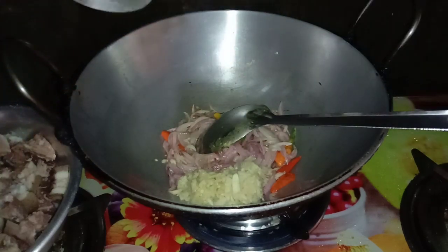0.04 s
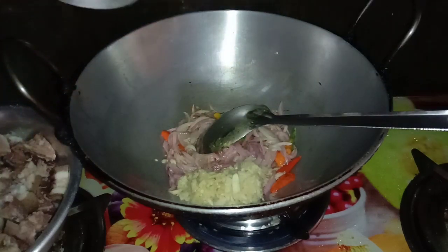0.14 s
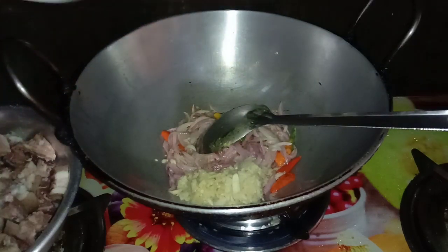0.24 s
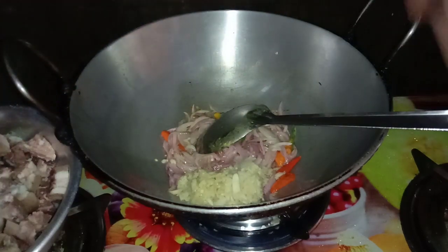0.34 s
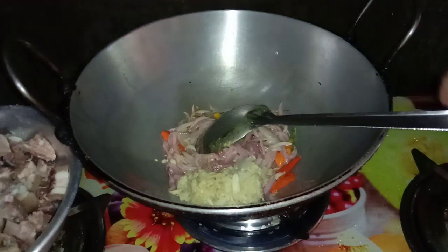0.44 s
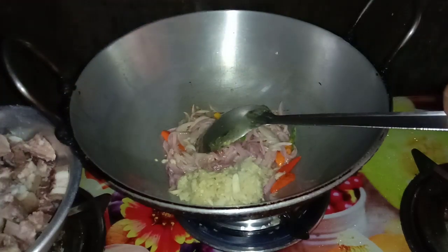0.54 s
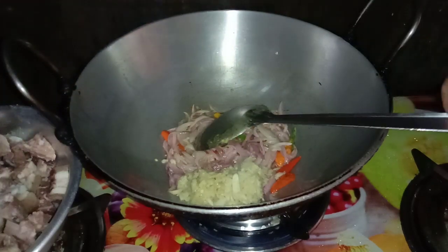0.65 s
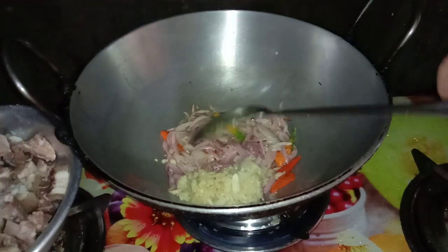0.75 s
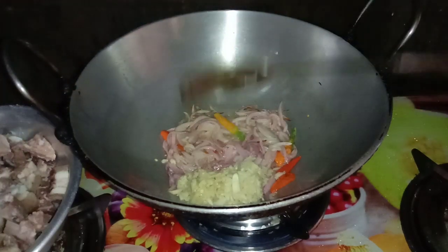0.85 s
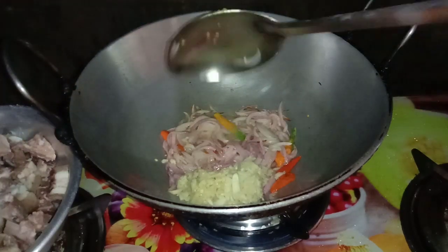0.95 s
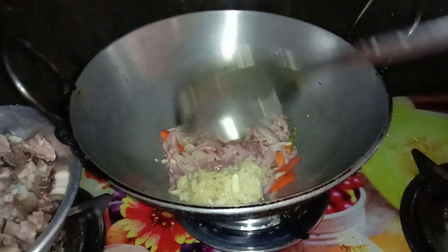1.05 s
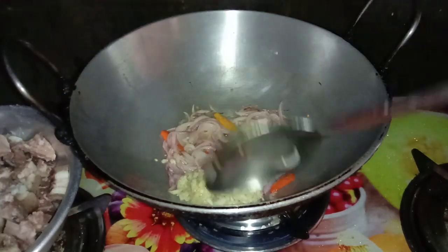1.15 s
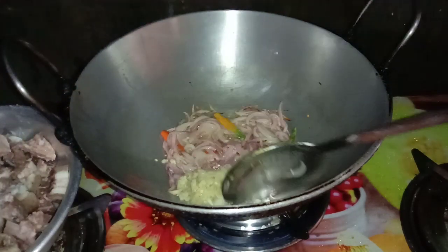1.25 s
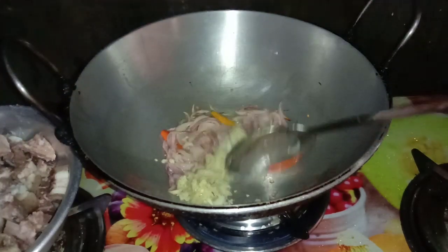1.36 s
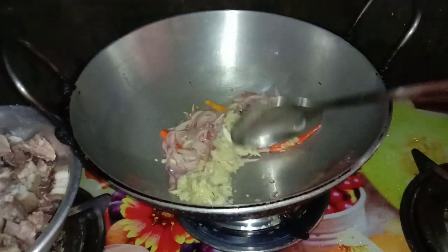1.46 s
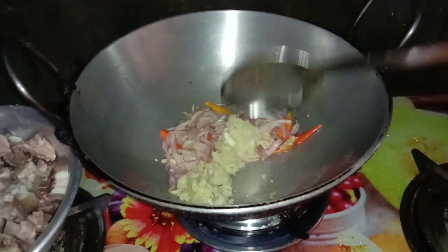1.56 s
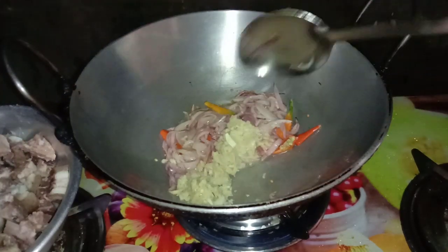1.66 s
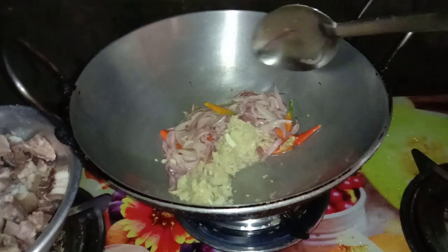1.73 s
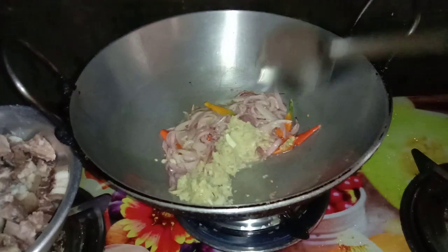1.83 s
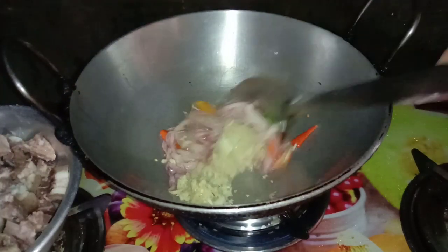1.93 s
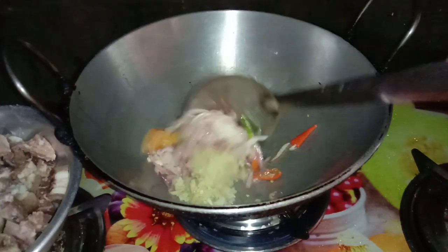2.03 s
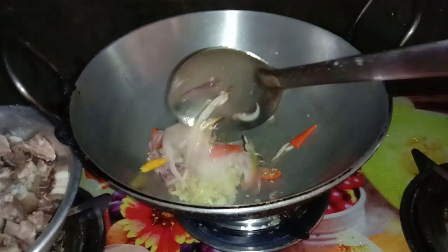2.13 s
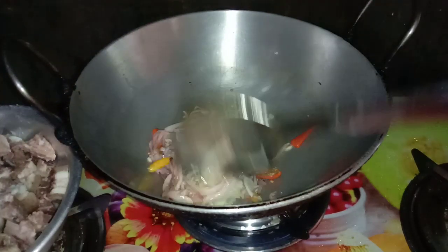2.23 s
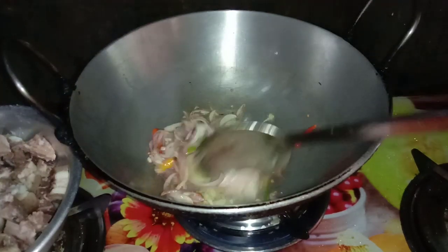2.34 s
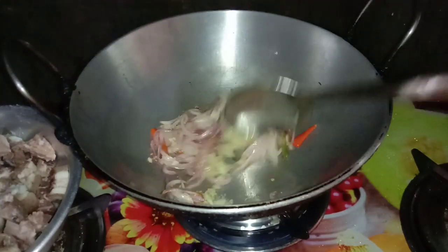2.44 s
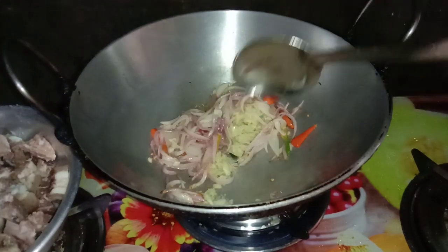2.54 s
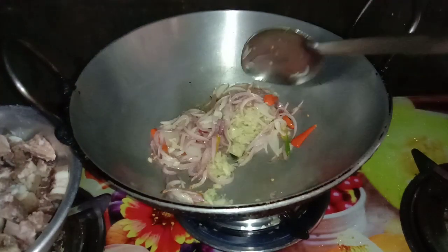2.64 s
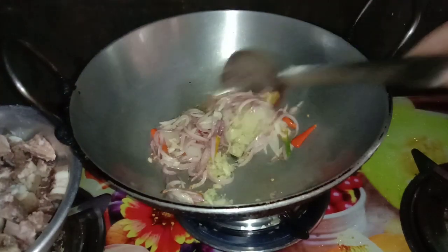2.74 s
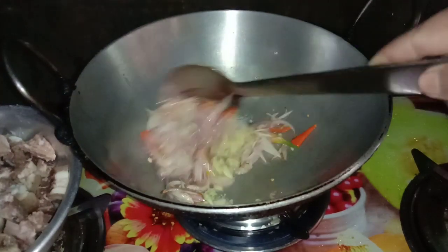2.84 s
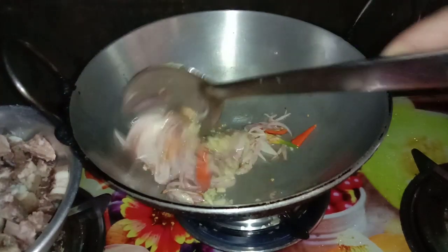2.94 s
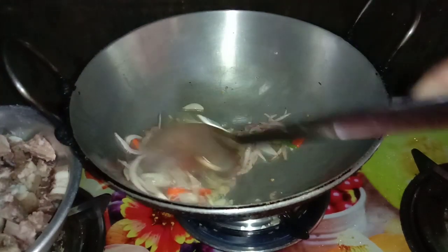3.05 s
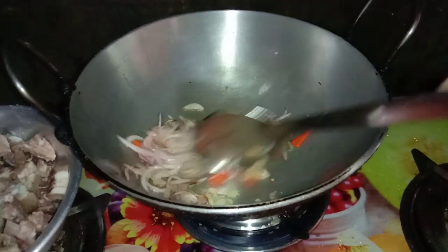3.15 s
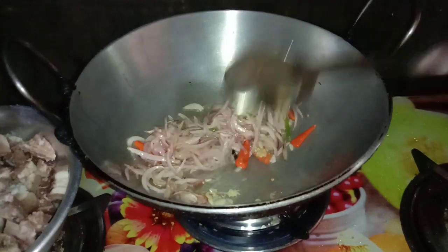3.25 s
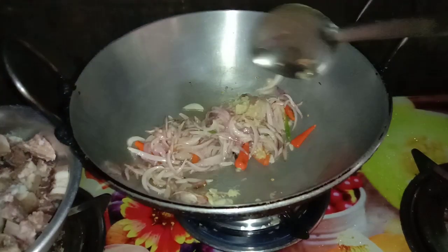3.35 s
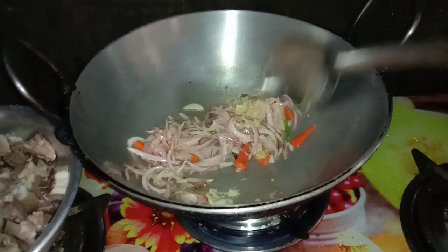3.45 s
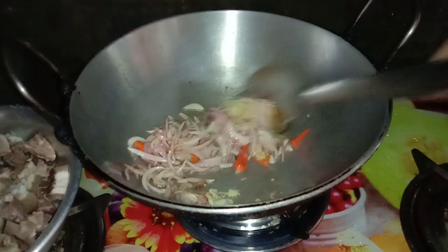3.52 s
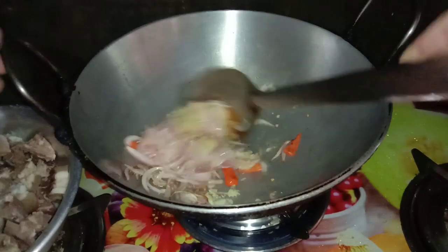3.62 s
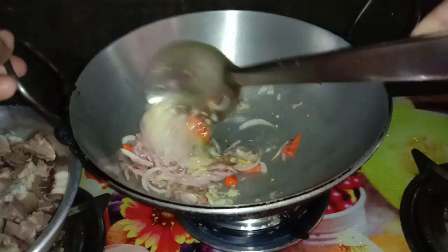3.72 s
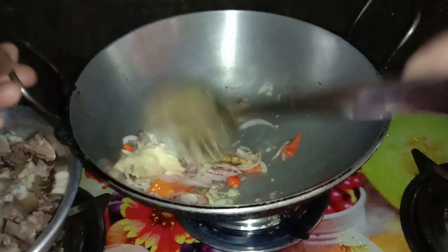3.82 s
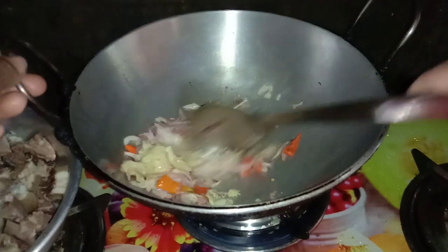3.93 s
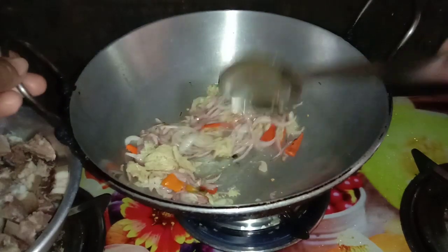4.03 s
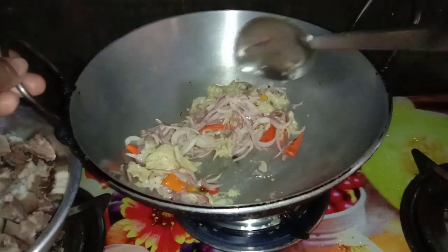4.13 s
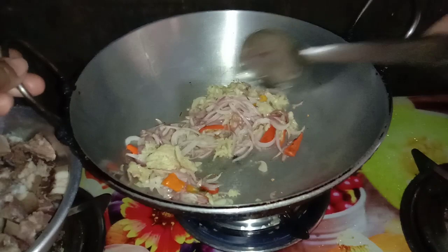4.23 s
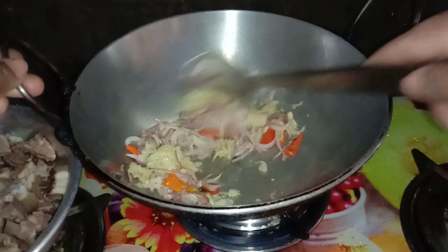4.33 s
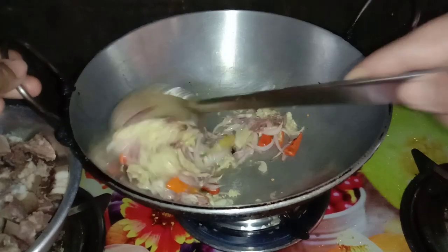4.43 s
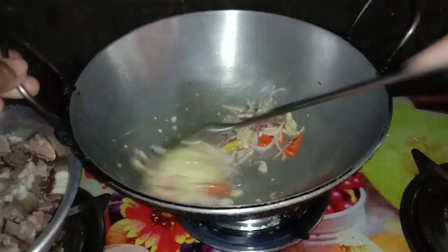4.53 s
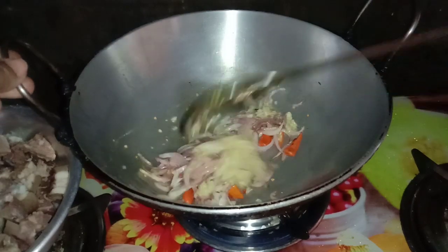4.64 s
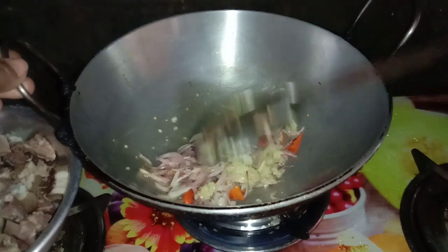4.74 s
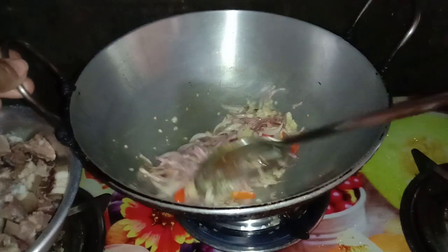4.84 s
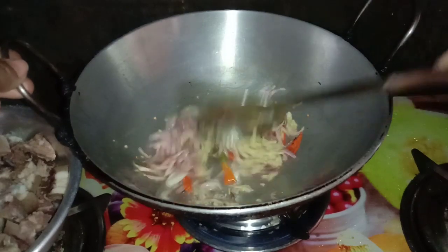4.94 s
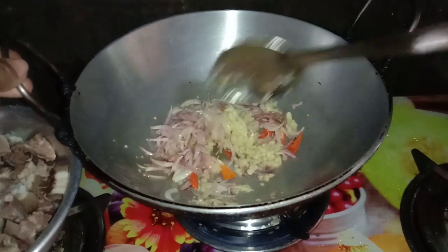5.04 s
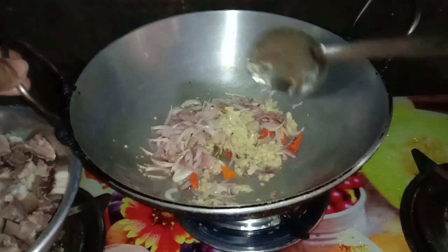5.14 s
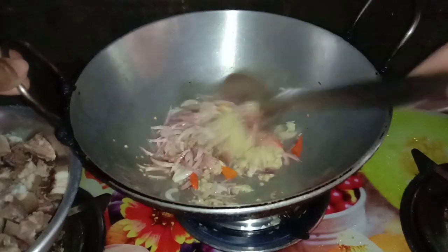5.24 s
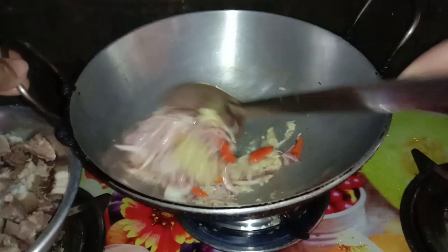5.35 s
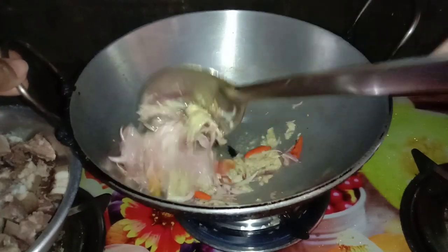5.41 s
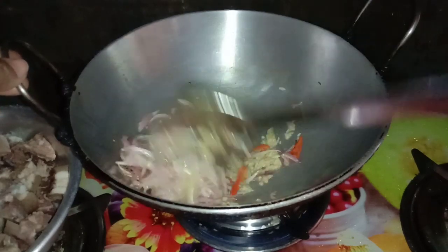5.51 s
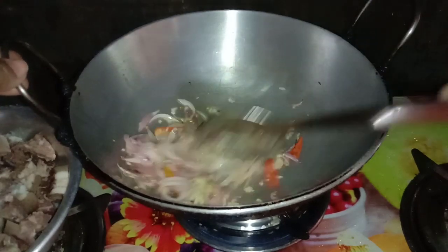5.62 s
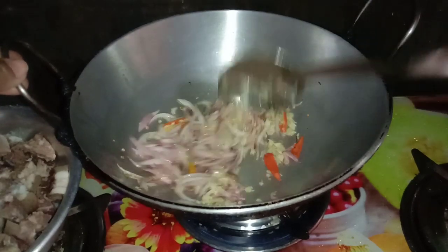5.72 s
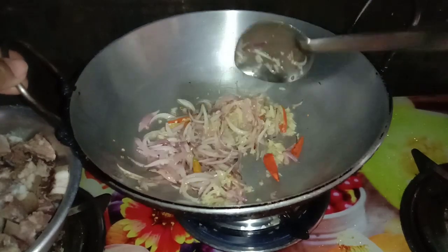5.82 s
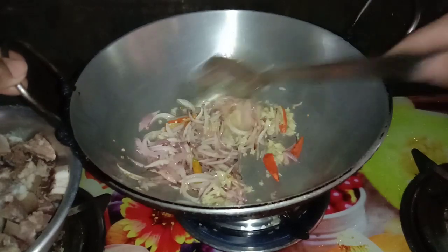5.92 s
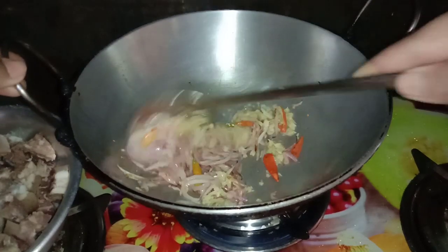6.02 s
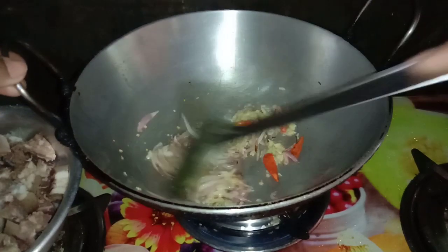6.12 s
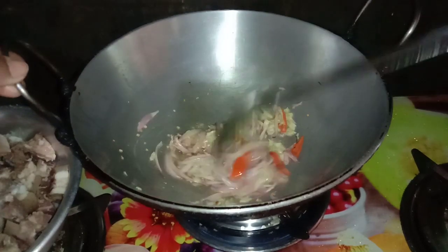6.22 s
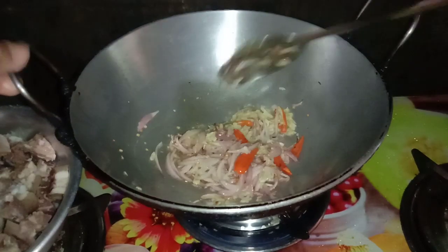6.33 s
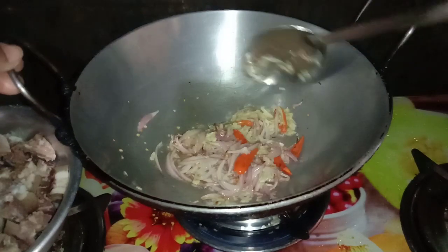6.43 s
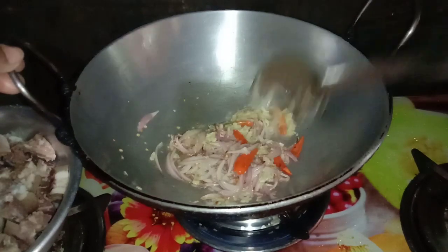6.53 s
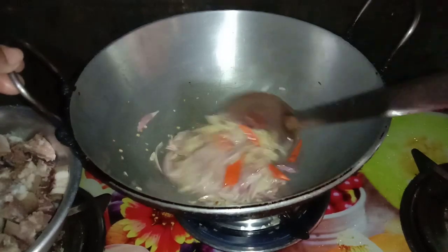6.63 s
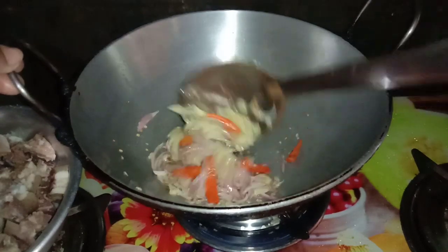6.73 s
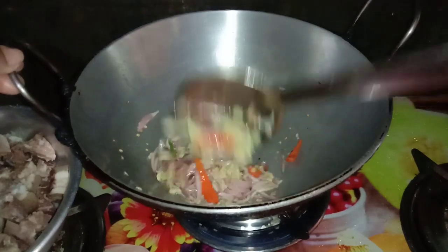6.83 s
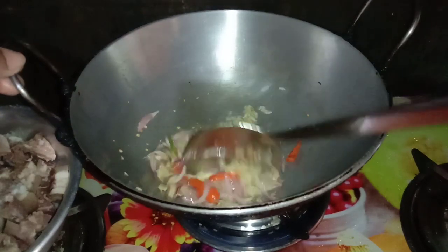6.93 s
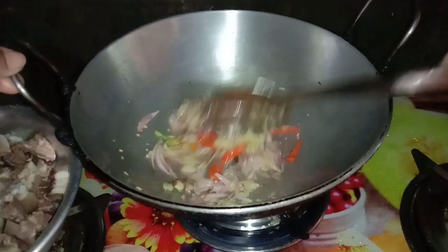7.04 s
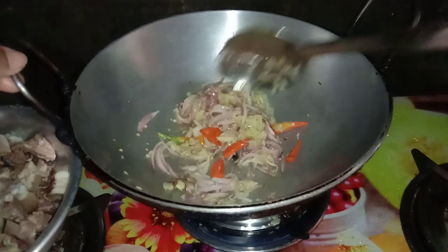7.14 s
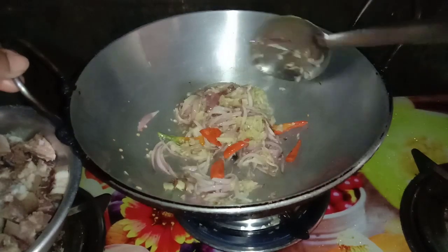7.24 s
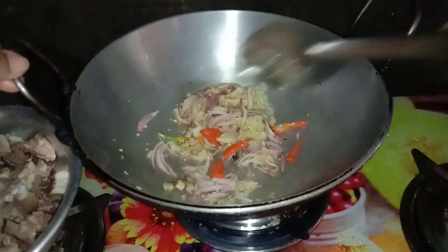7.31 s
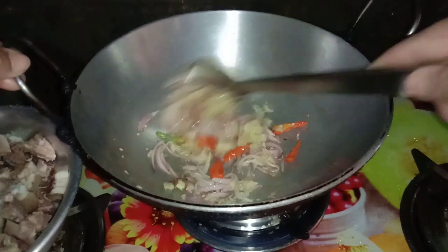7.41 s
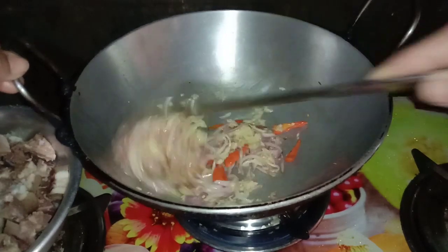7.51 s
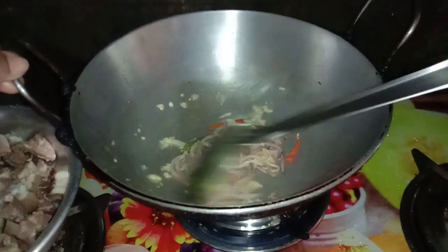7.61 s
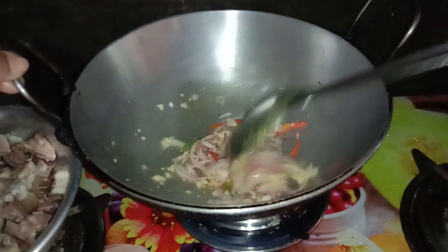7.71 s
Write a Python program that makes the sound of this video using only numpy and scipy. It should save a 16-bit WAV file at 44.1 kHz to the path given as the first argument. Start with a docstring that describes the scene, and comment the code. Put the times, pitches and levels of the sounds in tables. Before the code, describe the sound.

Close sizzling of vegetables frying in oil, with a steel bowl sliding aside, then a spoon striking, scraping and stirring in a wok.

```python
"""A steel bowl is set down and slid aside while onions and garlic sizzle in an oiled wok in a small kitchen.
A metal spoon strikes the wok, rocks it on its stand and stirs; a steadying hand damps the ring.
Each stroke presses wet food onto hot steel: water flashes to steam, so the sizzle swells and sinks.
Clumps land with soft thuds. A gas burner rushes underneath. The microphone is close."""
import sys
import numpy as np
from scipy import signal
from scipy.fft import rfft, irfft
from scipy.io import wavfile

SR = 44100
rng = np.random.default_rng(int(sys.argv[2]) if len(sys.argv) > 2 else 0)


def wav_record(signal):
    """Record a signal, one row per channel, as 16-bit PCM in the file named by sys.argv[1]."""
    frames = np.transpose(np.atleast_2d(signal))
    bounded = np.clip(frames, -1, 1)
    # unit amplitude maps onto the largest positive 16-bit level
    quanta = np.round(bounded * 32767).astype(np.int16)
    wavfile.write(sys.argv[1], SR, quanta)


N = 342657
TIME = np.arange(N) / SR

# sizzle of food lying still: t/s, level/dB
RESTING_SIZZLE = [(0.0, -35), (1.25, -34), (2.2, -34), (7.77, -37)]
# spoon strokes: t/s, length/s, release/s, sizzle/dB, spatter re sizzle/dB
STIR_STROKES = [(1.396, .27, .05, -31.5, -13.5), (1.69, 0.23, .05, -36, -23), (1.896, 0.25, .05, -30, -9.5),
                (2.12, .21, .04, -30.5, -7), (2.376, .11, 0.028, -26.5, -8.5),
                (2.51, 0.086, 0.045, -29, -11), (2.63, 0.24, 0.044, -29, -10.5),
                (2.851, 0.18, 0.073, -26.5, -12), (3.078, 0.46, 0.075, -28.3, -9.5),
                (3.598, 0.15, .015, -29.5, -13), (3.775, 0.19, .012, -30.5, -13),
                (3.986, .06, .04, -26, -20), (4.062, 0.24, .012, -29.5, -13.5),
                (4.324, .24, 0.064, -29, -10), (4.595, .19, .05, -27.5, -12),
                (4.818, 0.27, .06, -26.5, -14.5), (5.132, 0.29, .06, -27, -11.5),
                (5.449, .13, 0.063, -26.5, -11.5), (5.599, 0.19, 0.058, -26.5, -11.5),
                (5.853, 0.21, .012, -26.5, -12), (6.107, 0.15, 0.036, -27.5, -11.5),
                (6.273, .36, .06, -27.5, -12), (6.659, .16, .05, -29.5, -8),
                (6.852, 0.12, .04, -25.5, -13.5), (7.016, .09, 0.031, -26, -10.5),
                (7.138, 0.25, 0.044, -28, -10.7), (7.393, .16, 0.049, -26, -12.5),
                (7.59, .17, .05, -27.8, -10)]
# fine steam bursts: f/Hz, level/dB
FIZZ_SPECTRUM = [(40, -35), (400, -52), (750, -25.5), (900, -23.5), (1080, -39.5), (1250, -10), (1480, -17),
                 (2400, -20.5), (3000, -12.5), (3700, -8.5), (5000, -1.5), (6000, -1.5), (16000, -1.5)]
# coarse wet spatter: f/Hz, level/dB
SPATTER_SPECTRUM = [(40, -36.5), (330, -21), (520, -37.5), (780, -35), (920, -6.5), (1080, -10), (1250, 3),
                    (1480, -15), (1950, -0.5), (2350, -4), (3100, 2), (5000, -0.5), (9000, -10.5),
                    (16000, -13)]
# spoon on wok: t/s, tick/dB, clack/dB, clack f/Hz, wall ring/dB, belly ring/dB, damping t60/s
SPOON_BLOWS = [(1.099, -22, -29, 3300, -65, -55, .09), (1.2165, -9, -13, 1670, -30, -54, 27),
               (1.285, -45, -50, 2600, -46, -47, 4.4), (1.828, -41, -20, 2660, -42, -52.5, 3.8),
               (1.897, -26, -23, 2630, -51, -42, .2), (2.276, -15.5, -29, 3520, -65, -45, 0.14),
               (2.536, -21, -28, 2600, -57, -46, 0.13), (2.694, -40, -30, 2400, -44, -53.5, 0.74),
               (4.196, -40, -21.5, 535, -42, -37.5, 0.22), (4.4028, -25, -21, 1210, -28.5, -40.5, 0.098),
               (4.5489, -19, -36, 3500, -60, -63, .1), (5.8466, -15.5, -24, 2360, -33, -43.5, 0.31),
               (6.4563, -13.5, -20, 2750, -53.5, -41, 0.42), (6.529, -26, -38, 2600, -43, -40, 0.25),
               (7.256, -12.5, -14.5, 2600, -40, -38.5, 0.34), (7.284, -39, -24, 2450, -41, -40.5, 0.25)]
# free wok modes: f/Hz, level/dB, t60/s
WOK_MODES = [(358, 3, 13.5), (517, -8, 6.6), (648, -11.5, 2.9), (1088, 0.5, 0.73), (1150, -1, 1.03),
             (2000, -15, 0.79), (2340, -31, .15), (2550, -17, 0.3), (2900, -27, .5), (4720, 0, 0.31),
             (6280, 3.5, 0.21), (7620, -5, 0.24), (7470, -3, 0.67), (8370, 0, 0.45), (8460, 8, 0.091)]
# hard edge contact: f/Hz, level/dB
TICK_SPECTRUM = [(200, -72), (900, -51), (1700, 1), (2500, 14), (3300, 16.5), (4200, 17), (5000, 22),
                 (8000, 20.5), (16000, -3)]
# duller clack of the spoon's bowl: ratio to clack f, level/dB
CLACK_SPECTRUM = [(.04, -38), (.16, 5), (.3, -1), (.55, -4), (.8, 0), (1.0, 23), (1.3, -16.5), (2.4, -8),
                  (6, -7)]
# wok landing on its stand: t/s, level/dB, t60/s, tilt/(dB/octave)
STAND_KNOCKS = [(1.6115, -18, 0.072, 3.5), (1.62, -23, 0.17, -2), (1.8316, -18, 0.059, 3.5),
                (1.837, -20, 0.088, 0), (1.897, -31.5, 0.14, 1.5)]
# clunk of the stand: f/Hz, level/dB
STAND_SPECTRUM = [(50, -45), (130, -13), (190, 1), (290, -5.5), (420, 4), (520, -5), (620, 7.5), (740, -13),
                  (850, -4.5), (1150, -1.5), (1350, -4.5), (1600, -16), (3000, -16), (9000, -69)]
# spoon dragged over steel: t/s, length/s, wall/dB, belly/dB, wall f/Hz
SPOON_SCRAPES = [(1.903, 0.018, -31.5, -42, 2950), (2.259, 0.03, -24, -54, 5700),
                 (2.702, .1, -52, -54.5, 1100), (4.396, 0.047, -35, -40.5, 1123),
                 (4.832, .04, -41.5, -62, 1250), (5.862, 0.07, -38, -48, 1110),
                 (5.971, 0.11, -42, -39.5, 1110), (6.453, 0.11, -37, -50, 2590),
                 (7.355, 0.049, -34, -53, 1227), (7.43, .11, -39.5, -39, 1065)]
# scraped wok belly: f/Hz, level/dB
BELLY_SPECTRUM = [(60, -43), (280, -11), (370, 6), (480, 4), (620, 0.5), (740, 10.5), (900, 5), (1400, 3),
                  (2200, -13), (6000, -26)]
# steel bowl modes: f/Hz, width/Hz, level/dB
BOWL_MODES = [(928, 65, -2), (2058, 74, 1.5), (2990, 150, -2.5), (4430, 43, -5.5), (5290, 84, 5),
              (5680, 97, -0.5), (6750, 710, -6), (7230, 160, -14), (9600, 200, 3.5), (11640, 130, 0),
              (12350, 120, -3), (13040, 200, 4)]
# bowl touching down: t/s, level/dB, low ring offset/dB, t60/s
BOWL_LANDINGS = [(.005, -19.5, 15.5, 0.059), (.066, -30, 2, 0.064), (0.536, -18, -21, 0.097)]
# bowl sliding: top speed t/s, rise/s, fall/s, level/dB, low ring offset/dB, high ring offset/dB
BOWL_SLIDES = [(.088, 0.015, 0.023, -34, 8, 4.5), (.44, 0.12, 0.097, -42, 7, 0),
               (1.005, 0.068, 0.036, -34.5, -6.5, -7)]
# clumps landing: t/s, level/dB, f/Hz
FOOD_PLOPS = [(2.424, -46.5, 400), (2.49, -45.5, 420), (2.693, -45, 516), (3.178, -49.5, 296),
              (4.844, -48, 404), (5.032, -50, 367), (5.204, -44.5, 400), (5.629, -47.5, 386),
              (6.87, -52, 377)]
# gas flame and kitchen: f/Hz, level/dB
RUMBLE_SPECTRUM = [(20, -4), (50, -15), (90, -2.5), (190, -2), (300, 0), (440, -0.5), (600, -6), (1000, -8),
                   (4000, -45)]
# level of the low rumble: t/s, level/dB
LOW_RUMBLE_LEVEL = [(0, -67), (.72, -58.5), (.95, -64), (1.4, -57), (2.2, -68), (3.5, -74), (4.4, -61.5),
                    (5.4, -72), (7.77, -67.5)]
# microphone port: f/Hz, gain/dB
MIC_RESPONSE = [(5500, -0.5), (6250, 3.5), (6600, -4), (7000, 4), (7600, 1.5), (8200, -4.5), (9500, -10),
                (11500, -15.5), (13000, -21), (14100, -8), (14750, -9), (15500, -1)]


def sizzle():
    """Water flashes to steam in oil: tiny bursts, sharp pops, jets, ringing bubbles, coarse spatter."""
    fizz_gain, spatter_gain = steam_gains()
    sharp = pops(per_s=900, spread_db=1.6)
    jets = steam_jets(per_s=170, spread_db=2.1, t60_s=.02)
    bubbles = unit(sum(resonate(pops(per_s=300, spread_db=3.8), hz, hz / 6)
                       for hz in np.geomspace(2500, 15000, num=9)))
    haze = pops(per_s=14000, spread_db=1)
    fine = unit(undb(2.5) * haze + undb(.5) * sharp + undb(-.5) * jets + undb(-7.5) * bubbles)
    coarse = unit(pops(per_s=2500, spread_db=2) + .5 * sharp + .59 * jets)
    flurry_db = .96 * walk(30) + .24 * walk(220)  # single pieces touch the metal
    fizz = undb(5.5) * fizz_gain * unit(colour(fine, FIZZ_SPECTRUM))
    spatter = undb(2.5) * spatter_gain * unit(colour(coarse, SPATTER_SPECTRUM))
    return undb(flurry_db) * (fizz + spatter)


def steam_gains(resting_spatter_db=-10.5, pile_up_db=.4, attack_s=.014):
    """Fizz and spatter gains: steam from resting food and from each stroke adds in power."""
    fizz_power = undb(curve(RESTING_SIZZLE)) ** 2
    spatter_power = fizz_power * undb(resting_spatter_db) ** 2
    for start_s, length_s, release_s, db, spatter_db in STIR_STROKES:
        progress = np.clip((TIME - start_s) / length_s, 0, 1)
        gain = undb(db + pile_up_db * (progress - .5))  # food piles up before the spoon
        power = (gain * press(start_s, length_s, attack_s, release_s)) ** 2
        fizz_power += power
        spatter_power += power * undb(spatter_db) ** 2
    return np.sqrt(fizz_power), np.sqrt(spatter_power)


def steam_jets(per_s, spread_db, t60_s):
    """Tiny jets start at once and hiss out in milliseconds; rms 1."""
    power = convolve(pops(per_s, spread_db) ** 2, fade(TIME[:4096], t60_s) ** 2)
    return unit(np.sqrt(np.abs(power)) * rng.standard_normal(N))


def spoon_blows(belly_below_hz=700):
    """Each blow ticks, clacks and rings the wok; close modes beat, hand and spoon damp them."""
    out, t = np.zeros(N), TIME[:3 * SR]
    for start_s, tick_db, clack_db, clack_hz, wall_db, belly_db, damping_t60_s in SPOON_BLOWS:
        tick = burst(TICK_SPECTRUM, t60_s=.0029) + undb(-3.5) * burst(TICK_SPECTRUM, t60_s=.066)
        add(out, start_s, undb(tick_db) * tick)
        clack = burst([(ratio * clack_hz, db) for ratio, db in CLACK_SPECTRUM], t60_s=.021)
        add(out, start_s, undb(clack_db) * clack)
        ring = np.zeros(len(t))
        for hz, db, t60_s in WOK_MODES:
            drive_db = belly_db if hz < belly_below_hz else wall_db
            ring += undb(db + drive_db) * fade(t, t60_s) * np.sin(2 * np.pi * hz * t)
        # a spoon left on the steel rattles and roughens the ring
        rattle_db = 3 * min(.3 / damping_t60_s, 1) * walk(130)[:len(t)]
        add(out, start_s, ring * undb(rattle_db) * fade(t, damping_t60_s))
    return out


def radiate(x, cutoff_hz=270):
    """An open pan radiates little below its lowest mode."""
    return signal.sosfilt(signal.butter(3, cutoff_hz, "highpass", fs=SR, output="sos"), x)


def stand_knocks(pivot_hz=700, tilt_top_hz=1300):
    """The wok tips and clunks onto its iron stand; high bending waves arrive before low ones."""
    out = np.zeros(N)
    for start_s, db, t60_s, db_per_octave in STAND_KNOCKS:
        spectrum = [(hz, level_db + db_per_octave * np.log2(min(hz, tilt_top_hz) / pivot_hz))
                    for hz, level_db in STAND_SPECTRUM]
        add(out, start_s, undb(db) * burst(spectrum, t60_s))
    return out


def spoon_scrapes(attack_s=.0038, release_s=.013):
    """The spoon's edge catches and slips; its pressure sets each scrape's wall resonance."""
    out = np.zeros(N)
    slips = pops(per_s=2000, spread_db=3)
    # the contact point wanders, so low resonances come and go
    wander = sum(undb(4 * walk(30)) * resonate(slips, hz, hz / 9)
                 for hz in np.geomspace(360, 1450, num=9))
    belly = unit(colour(unit(wander) + .31 * slips, BELLY_SPECTRUM))
    for start_s, length_s, wall_db, belly_db, hz in SPOON_SCRAPES:
        wall = unit(resonate(resonate(slips, hz, .068 * hz), hz, .24 * hz))
        contact = press(start_s, length_s, attack_s, release_s)
        out += contact * (undb(wall_db) * wall + undb(belly_db) * belly)
    return out


def steel_bowl(low_below_hz=1500, mid_below_hz=2500):
    """A bowl chatters down and slides; the counter keeps its modes short."""
    low, mid, high = np.zeros((3, N))  # contact force per band
    stick_slip_db = 3 * walk(35.1)
    for peak_s, rise_s, fall_s, db, low_db, high_db in BOWL_SLIDES:
        width_s = np.where(TIME < peak_s, rise_s, fall_s)
        push = undb(db + stick_slip_db) * np.exp(-.5 * ((TIME - peak_s) / width_s) ** 2)
        low += push * undb(low_db)
        mid += push
        high += push * undb(high_db)
    for start_s, db, low_db, t60_s in BOWL_LANDINGS:
        tap = undb(db - 6) * fade(TIME, t60_s)
        add(low, start_s, tap * undb(low_db - 4))
        add(mid, start_s, tap * undb(-10))
        add(high, start_s, tap)
    out = np.zeros(N)
    grit = pops(per_s=6400, spread_db=1.5)
    for hz, width_hz, db in BOWL_MODES:
        force = undb(-9.5) * low if hz < low_below_hz else mid if hz < mid_below_hz else high
        ring = resonate(resonate(grit * force, hz, width_hz), hz, 4 * width_hz)
        out += undb(db) * ring * np.sqrt(SR / (np.pi * width_hz))
    rasp = undb(-.5) * high * unit(colour(grit, TICK_SPECTRUM))
    return out + rasp


def food_plops():
    """Wet clumps thud back into the pan over a faint patter of small pieces."""
    patter = sum(resonate(pops(per_s=6, spread_db=1.5), hz, hz / 11) / hz ** .5
                 for hz in np.geomspace(140, 620, num=10))
    out = undb(-64) * unit(patter)
    for start_s, db, hz in FOOD_PLOPS:
        spectrum = [(hz / 5, -28), (hz / 2, -9), (hz, 0), (hz * 1.26, -12), (hz * 10, -38)]
        add(out, start_s, undb(db) * burst(spectrum, t60_s=.18))
    return out


def low_rumble():
    """Gas burner and kitchen; the rumble swells and sinks, its bands flutter independently."""
    flutter = sum(undb(3.5 * walk(18)) * unit(resonate(rng.standard_normal(N), hz, hz / 4))
                  for hz in np.geomspace(60, 900, num=11))
    return undb(curve(LOW_RUMBLE_LEVEL) + walk(15)) * unit(colour(flutter, RUMBLE_SPECTRUM))


def kitchen(x, size=16384):
    """Early reflections off pan and wall, then a short room tail."""
    t = TIME[:size]
    early = rng.standard_normal(size) * fade(t, t60_s=.012) * (t > .0004)
    tail = rng.standard_normal(size) * fade(t, t60_s=.27) * (t > .006)
    response = undb(-18) * early / np.linalg.norm(early) + undb(-11.5) * tail / np.linalg.norm(tail)
    return x + convolve(x, response)


def pops(per_s, spread_db):
    """Random clicks, many small, few large; rms 1."""
    gain = undb(spread_db * np.minimum(rng.exponential(size=N), 5))
    return unit((rng.random(N) < per_s / SR) * gain * rng.choice([-1, 1], N))


def burst(spectrum, t60_s, size=16384):
    """Coloured noise decaying from rms 1."""
    return unit(colour(rng.standard_normal(size), spectrum)) * fade(TIME[:size], t60_s)


def walk(rate_hz):
    """Smooth random drift, spread near 1."""
    knots = rng.standard_normal(4096)
    return np.interp(TIME * rate_hz, np.arange(len(knots)), knots)


def press(start_s, length_s, attack_s, release_s):
    """Attack, hold and release of one contact."""
    t = np.maximum(TIME - start_s, 0)
    return (1 - np.exp(-t / attack_s)) * np.exp(-np.maximum(t - length_s, 0) / release_s)


def fade(t, t60_s):
    """Exponential decay."""
    return np.exp(-np.log(1000) * t / t60_s)


def curve(points):
    """Linear interpolation of (t/s, value) points."""
    return np.interp(TIME, *np.transpose(points))


def colour(x, spectrum, size=2048):
    """Minimum-phase filter through (f/Hz, level/dB) points."""
    hz, db = np.transpose(spectrum)
    grid_hz = np.maximum(np.arange(size // 2 + 1) * SR / size, 1)
    gain = undb(np.interp(np.log(grid_hz), np.log(hz), db))
    cepstrum = irfft(np.log(gain))
    cepstrum[1:size // 2] *= 2
    cepstrum[size // 2 + 1:] = 0
    return convolve(x, irfft(np.exp(rfft(cepstrum))))


def resonate(x, hz, width_hz):
    """One resonance, gain 1 at centre."""
    return signal.lfilter(*signal.iirpeak(hz, hz / width_hz, fs=SR), x)


def convolve(x, response):
    """Causal convolution, length kept."""
    return signal.fftconvolve(x, response)[:len(x)]


def add(out, start_s, sound):
    """Mix in at start_s."""
    i = int(start_s * SR)
    out[i:i + len(sound)] += sound[:N - i]


def undb(db):
    """dB to gain."""
    return 10 ** (np.asarray(db) / 20)


def unit(x):
    """Scale to rms 1."""
    return x / np.sqrt(np.mean(x ** 2))


def scene():
    """All sources in one place; identical channels."""
    in_room = kitchen(sizzle() + stand_knocks() + spoon_scrapes() + food_plops() + steel_bowl())
    mono = in_room + radiate(spoon_blows()) + low_rumble()
    return np.array([mono, mono])


def record(dry, cutoff_hz=15520):
    """The microphone port colours the treble; a steep low-pass cuts the top."""
    heard = np.array([colour(channel, MIC_RESPONSE) for channel in dry])
    return signal.sosfilt(signal.ellip(12, .2, 80, cutoff_hz, fs=SR, output="sos"), heard)


dry = scene()
out = record(dry)
wav_record(out)
```